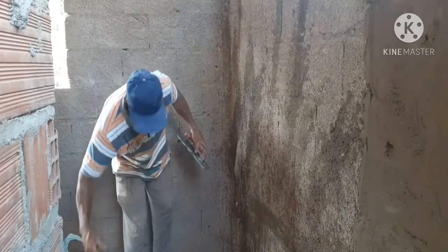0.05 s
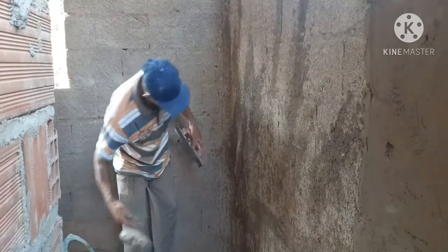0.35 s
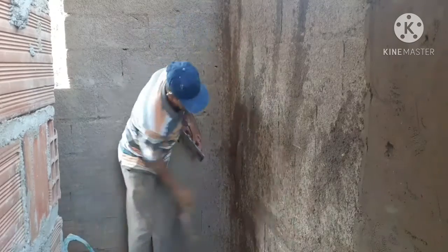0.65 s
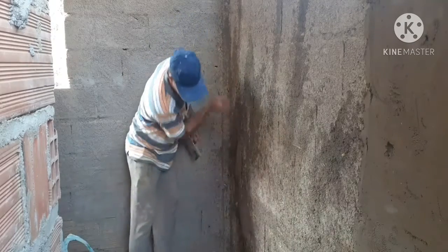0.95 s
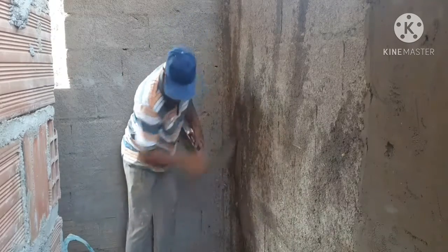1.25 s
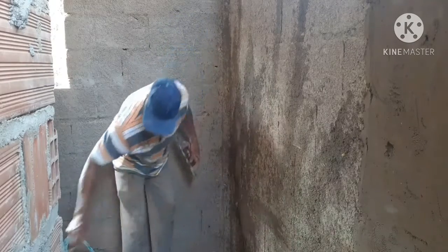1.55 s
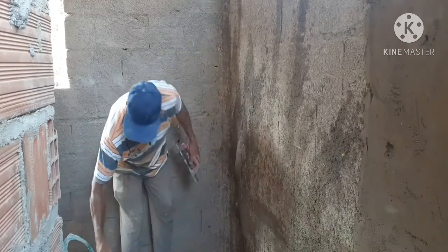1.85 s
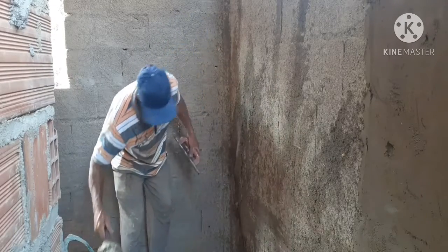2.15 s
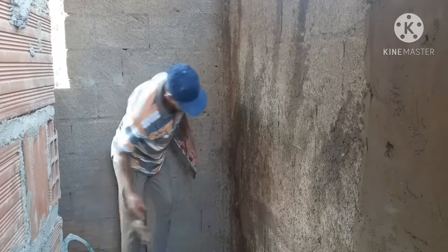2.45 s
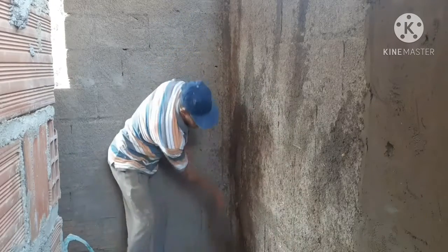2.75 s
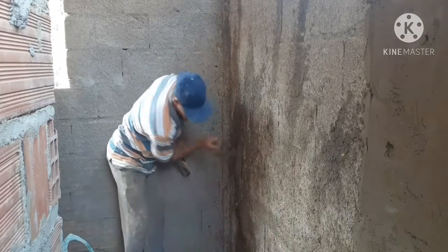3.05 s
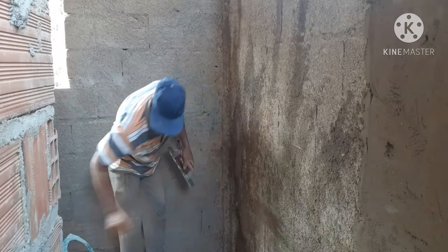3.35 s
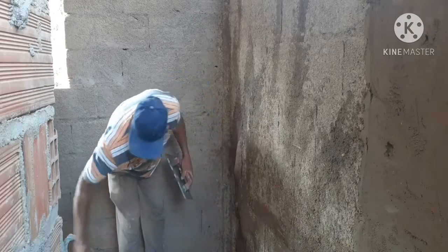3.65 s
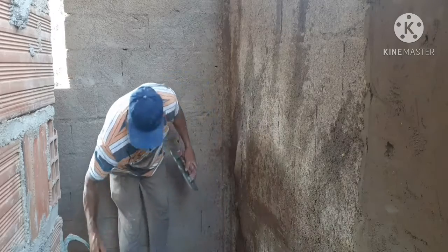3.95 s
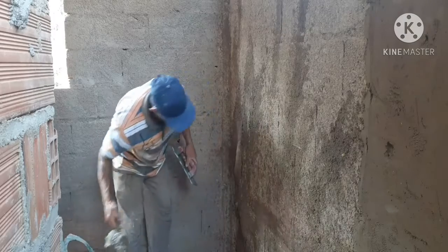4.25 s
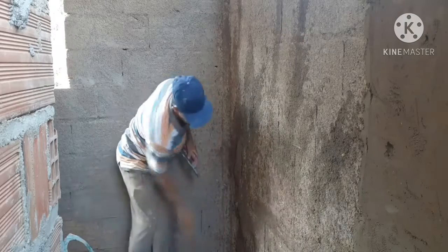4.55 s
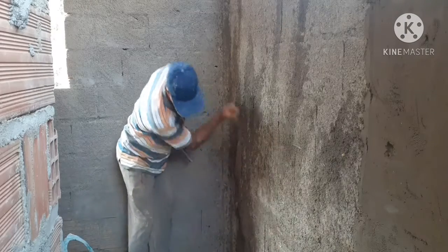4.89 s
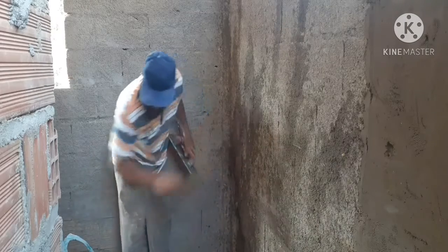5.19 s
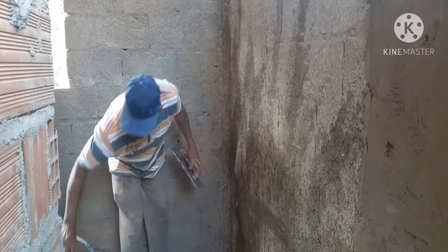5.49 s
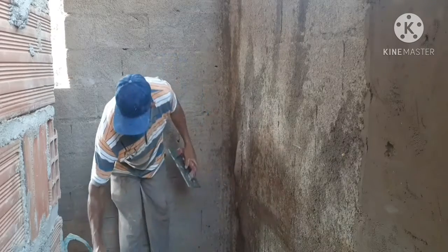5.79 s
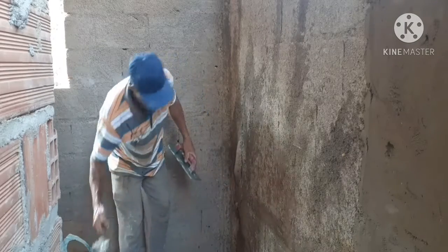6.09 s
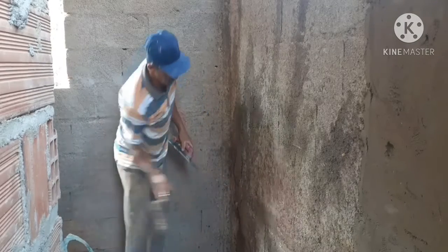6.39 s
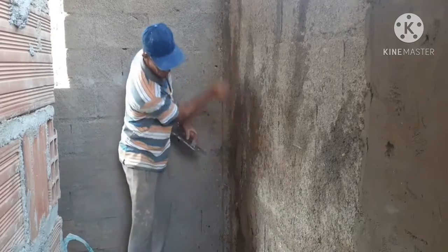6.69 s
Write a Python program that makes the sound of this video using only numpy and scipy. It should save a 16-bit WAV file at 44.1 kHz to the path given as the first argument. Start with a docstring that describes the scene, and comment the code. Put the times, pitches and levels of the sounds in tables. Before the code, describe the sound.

Four sharp, wet splats of thrown mortar in a small bare room, a trowel scooping between them, over distant traffic and birds.

```python
"""A small bare concrete room, where a plasterer throws four trowels of wet mortar at a block wall.
Each load hisses off the blade and lands as four clods in about 20 ms: a thud, a wet smack, a sandy spray.
Crumbs tick down, and the trowel knocks and scrapes in the tub; the walls add a quick, dense echo.
Outside, small birds chirp far off over a low rumble and distant traffic.
We listen from a phone with two microphones, a few metres away."""
import sys
import numpy as np
from scipy import signal
from scipy.fft import rfft, irfft
from scipy.io import wavfile
from scipy.ndimage import uniform_filter1d

SR = 44100
rng = np.random.default_rng(int(sys.argv[2]) if len(sys.argv) > 2 else 0)


def output_pcm(signal):
    """Save a mono or channel-first signal as 16-bit PCM at the path in sys.argv[1].

    Samples are clipped to [-1, 1] before scaling.
    """
    pcm = np.clip(np.atleast_2d(signal).T, -1, 1) * 32767
    wavfile.write(sys.argv[1], SR, np.round(pcm).astype(np.int16))


N = 305613
TIME, SECOND, TAIL = (np.arange(n) / SR for n in (N, SR, SR * 6 // 10))  # time axes in seconds


def undb(db):
    """Decibels to gain."""
    return 10 ** (np.asarray(db) / 20)


def unit(x):
    """Scale to an average energy of one per channel."""
    return x / np.sqrt(np.mean(np.sum(x ** 2, axis=-1)) + 1e-30)


def level(x, db):
    """Scale a steady sound to an rms level."""
    return unit(x) * np.sqrt(x.shape[-1]) * undb(db)


def burst(x, db):
    """Scale a short sound to the energy of 10 ms at this level."""
    return unit(x) * np.sqrt(SR / 100) * undb(db)


def lookup(points, hz):
    """Read (Hz, value) points on a log-frequency axis."""
    f, value = np.transpose(points)
    return np.interp(np.log(hz + 1e-9), np.log(f), value)


def colour(x, points):
    """Minimum-phase EQ through (Hz, dB) points, rolling off below the first."""
    size = 4096
    hz = np.arange(size // 2 + 1) * SR / size
    gain = undb(lookup(points, hz)) * np.clip(hz / points[0][0], .01, 1) ** 2
    cepstrum = irfft(np.log(gain))
    cepstrum[1:size // 2] *= 2
    cepstrum[size // 2 + 1:] = 0
    response = irfft(np.exp(rfft(cepstrum)))
    return np.apply_along_axis(lambda v: signal.fftconvolve(v, response)[:len(v)], -1, x)


def add(track, s, sound):
    """Mix a sound in at s seconds."""
    i = max(int(s * SR), 0)
    track[..., i:i + sound.shape[-1]] += sound[..., :max(N - i, 0)]


def drift(rate_hz):
    """Smooth random modulation with a spread near one."""
    hold = max(int(SR / rate_hz), 1)
    steps = np.repeat(rng.standard_normal(N // hold + 1), hold)
    return np.sqrt(2) * uniform_filter1d(steps, hold)[:N]


def swell(s, rise_s, fall_s):
    """Speed of one sweep of the arm: up to a peak of one and down again."""
    t = TIME - s
    return np.exp(-.5 * np.clip(t / np.where(t < 0, rise_s, fall_s), -10, 10) ** 2)


def grit(n, spread_db):
    """Dense sand-grain clicks; more spread makes a few stand out."""
    grains = rng.standard_normal(n)
    size_db = max(spread_db, 0) * np.minimum(rng.exponential(size=n), 6)
    return level(grains * undb(size_db), 0)


def splat(eq, db, fade_s, spread_db):
    """One soft contact: a rush of grain clicks that dies within milliseconds."""
    t = SECOND[:SR // 8]
    return burst(colour(grit(len(t), spread_db) * np.exp(-t / fade_s), eq), db)


def pop(hz, db, cycles):
    """A pressure pulse that peaks after this many cycles and dies."""
    phase = hz * SECOND[:SR // 8]
    return burst(np.sin(2 * np.pi * phase) * phase * np.exp(-np.minimum(phase / cycles, 20)), db)


def ring(modes):
    """A struck resonance: one decaying sine per mode."""
    return sum(undb(db) * unit(np.sin(2 * np.pi * hz * TAIL) * undb(-60 * np.minimum(TAIL / t60, 10)))
               for hz, db, t60 in modes)


def diffuse(n, mic_gap_m=.2):
    """Noise from all sides at two spaced microphones: alike in the bass, unrelated in the treble."""
    mid, side = rfft(rng.standard_normal((2, n)))
    likeness = .97 * np.sinc(2 * np.arange(len(mid)) * SR / n * mic_gap_m / 343)
    mid *= np.sqrt((1 + likeness) / 2)
    side *= np.sqrt((1 - likeness) / 2)
    return irfft(np.array([mid + side, mid - side]), n)


def flatten(response, width_hz=110):
    """Even out the random echo's broad bands, keeping its fine ripple, so every hit has a like tone."""
    spectrum = rfft(response, SR)
    power = uniform_filter1d(np.mean(abs(spectrum) ** 2, axis=0), width_hz)
    return unit(irfft(spectrum / np.sqrt(power + 1e-20))[:, :len(TAIL)])


# Standing waves between the walls. Each row: pitch in Hz, relative level in dB, t60 in seconds.
ROOM_MODES = [(49.6, -22, .6), (77, -24.5, 0.5), (106, -31.5, 0.28), (180.5, -26.5, 0.36),
              (236, -32.5, 0.13), (294, -39, 0.68), (419, -35.5, 0.58), (626, -20.5, 0.16),
              (802.5, -25, 0.2), (950, -22, 0.12), (1201, -24, 0.14), (1900, -24.5, 0.18)]
# How long the echo hangs. Each row: frequency in Hz, t60 in seconds.
ROOM_T60 = [(60, 0.58), (160, 0.26), (400, 0.19), (1000, 0.17), (3000, 0.18), (6000, 0.14), (14000, 0.16)]

def room(x, direct_db, late_db, left_db, lag_s):
    """Direct sound, a dense echo off near walls, standing waves and a faint tail from rooms beyond."""
    n = len(TAIL)
    spectrum, hz = rfft(diffuse(n)), np.arange(n // 2 + 1) * SR / n
    band_position = np.clip(np.log((hz + 1) / 60) / np.log(3), 0, 5)
    echo = 0
    for k in range(6):
        band = irfft(spectrum * np.maximum(1 - abs(band_position - k), 0), n)
        echo = echo + band * undb(-60 * TAIL / lookup(ROOM_T60, 60 * 3 ** k))
    attack = 1 - np.exp(-np.minimum(TAIL / .00046, 20))
    echo = unit(echo * attack)
    # the direct sound reaches the right microphone lag_s after the left
    echo[0, 0] += undb(direct_db)
    echo[1, int(lag_s * SR)] += undb(direct_db)
    beyond = colour(diffuse(n), [(40, 11), (500, -.5), (2500, -2.5), (12000, -3.5)])
    beyond *= undb(-60 * TAIL / .55)
    response = flatten(echo) + undb(-7.5) * ring(ROOM_MODES) + undb(late_db) * unit(beyond)
    pan = undb(np.array([[left_db], [-left_db]]) / 2)
    return signal.fftconvolve(x[None], unit(response), axes=-1)[:, :N] * pan


# EQs for the outdoor air, the traffic's whine and its drone. Each row: frequency in Hz, gain in dB.
AIR_EQ = [(18, -53.5), (30, 10.5), (152, -7.5), (410, -30), (443, -31.5), (492, -28.5), (691, -32.5),
          (808, -20), (1080, -52.5), (3400, -46), (3880, -55.5), (15500, -47.5)]
WHINE_EQ = [(300, -14.5), (560, 2), (700, 0), (810, 4), (1020, -3.5), (1230, -1.5), (1370, 1), (1520, -4),
            (1850, -11), (2250, -24.5), (2440, -15), (3000, -18), (6000, -39.5), (15000, -24.5)]
DRONE_EQ = [(150, -3.5), (210, -26), (240, 2.5), (275, -8), (370, -7), (520, -22.5), (1500, -44)]
# Traffic comes and goes. Each row: time in seconds, whine fader in dB, drone fader in dB.
TRAFFIC_FADERS = [(0, -71, -59), (.7, -76.5, -69.5), (2.602, -61, -69), (4.5, -67, -70), (5.3, -61, -60.5),
                  (6.198, -66.5, -61), (6.9, -56.5, -56.5)]
# The bed leans left. Each row: frequency in Hz, left minus right in dB.
OUTDOOR_PAN = [(60, 3.5), (110, 3.5), (220, 8), (700, 5.5), (1300, 6), (2400, 1.5), (15000, 1.5)]

def outdoors():
    """A restless bed of low rumble and far traffic, coming in through an opening on the left."""
    air = level(colour(diffuse(N), AIR_EQ), -56)
    bass = signal.sosfiltfilt(signal.butter(2, 350, fs=SR, output="sos"), air)
    s, *faders = np.transpose(TRAFFIC_FADERS)
    whine_db, drone_db = (np.interp(TIME, s, fader) for fader in faders)
    whine = level(colour(diffuse(N), WHINE_EQ), -3.2) * undb(whine_db + .87 * drift(9))
    drone = level(colour(diffuse(N), DRONE_EQ), -2.2) * undb(drone_db + 2.2 * drift(3.7))
    rumble = bass * undb(1.3 * drift(11))
    hiss = (air - bass) * undb(3.5)
    left_db = lookup(OUTDOOR_PAN, np.arange(N // 2 + 1) * SR / N)
    pan = undb(np.array([left_db, -left_db]) / 2)
    return irfft(rfft(rumble + hiss + whine + drone) * pan, N)


# Tones in the traffic. Each row: pitch in Hz, level in dB relative to the whine fader.
WHINE_TONES = [(700, -10.5), (810, -18), (1370, -18.5), (2440, -24)]

def traffic_tones():
    """A few rough, wavering tones stand out of the far traffic, fading in and out."""
    s, whine_db, _ = np.transpose(TRAFFIC_FADERS)
    warped_time = np.cumsum(1 + .03 * drift(4) + .04 * drift(130)) / SR
    tones = sum(undb(db + 3.7 * drift(4.7)) * np.sin(2 * np.pi * hz * warped_time)
                for hz, db in WHINE_TONES)
    fader = undb(np.interp(TIME, s, whine_db))
    return room(tones * fader, direct_db=-14, late_db=-8.5, left_db=9, lag_s=0)


# EQs for bright sand on steel and the tub's hollow scrape. Each row: frequency in Hz, gain in dB.
SAND_EQ = [(2500, -27.5), (5000, -9.5), (7000, -9.5), (10500, -2.5), (15500, -8.5)]
SCRAPE_EQ = [(150, -12.5), (330, 10), (600, 3), (850, 7.5), (1100, 4), (1330, 8.5), (1600, 0), (2400, 3),
             (3200, -0.5), (4500, 2), (6500, -6), (12000, -22.5)]
# Blade strokes, mostly a dig and then a softer lift.
# Each row: fastest moment in seconds, rise in seconds, sand level in dB, scrape level in dB.
STROKES = [(.07, 0.13, -61, -77), (1.178, 0.053, -66.5, -61.5), (1.561, 0.024, -60.5, -64),
           (1.64, 0.018, -70, -67), (1.797, 0.01, -47, -52), (2.085, 0.061, -60, -71.5),
           (3.757, 0.027, -51, -51), (3.96, 0.21, -75, -64), (4.089, 0.076, -62, -67.5),
           (5.739, 0.052, -52.5, -54), (5.96, 0.099, -62.5, -68)]

def scoops():
    """The blade drags unevenly through mortar: sand hisses on the steel and the tub resonates."""
    sand = level(colour(grit(N, spread_db=5), SAND_EQ), 0)
    scrape = level(colour(grit(N, spread_db=4), SCRAPE_EQ), 0)
    strokes = sum(swell(s, rise_s, fall_s=.046) * (sand * undb(sand_db) + scrape * undb(scrape_db))
                  for s, rise_s, sand_db, scrape_db in STROKES)
    return strokes * undb(1.75 * drift(70))


# Far calls. Each row: start in seconds, length in seconds, centre pitch in Hz, relative level in dB.
BIRD_CALLS = [(0.237, .13, 3920, -70.5), (2.42, 0.11, 4290, -77.5), (2.583, 0.13, 3790, -66),
              (3.427, 0.14, 4370, -71), (3.927, 0.061, 4060, -65), (4.364, 0.047, 6060, -81),
              (4.494, .14, 4145, -71), (5.139, .07, 4440, -68.5), (5.3, 0.12, 3840, -63.5),
              (6.165, 0.098, 3995, -68), (6.205, 0.1, 5430, -77)]

def birds(note_s=.035, step_s=.02, echo_t60=.5):
    """Falling runs of short raspy notes with a scratchy edge, smeared by the yards they cross."""
    out, n = np.zeros(N), int(note_s * SR)
    fall, scatter = .28, .075  # shares of the pitch: slide over a call, spread between notes
    for s, length, hz, db in BIRD_CALLS:
        rasp = level(uniform_filter1d(rng.standard_normal(SR), size=40), 0)
        scratch = level(signal.lfilter(np.hanning(22), 1, rng.standard_normal(SR)), -4)
        for delay, detune in zip(np.arange(0, length - note_s / 2, step_s), rng.standard_normal(20)):
            part = slice(int(delay * SR), int(delay * SR) + n)
            pitch = hz * (1 + fall * (.5 - SECOND[part] / length) + scatter * detune)
            phase = 2 * np.pi * np.cumsum(pitch * (1 + .06 * rasp[part])) / SR
            note = np.sin(phase) * (undb(14) + scratch[part]) * np.hanning(n)
            add(out, s + delay, level(note, db - 3))
    yards = unit(diffuse(SR) * undb(-60 * SECOND / echo_t60))
    return signal.fftconvolve(out[None], yards, axes=-1)[:, :N]


# EQs for crisp flying sand and a crumb's duller body. Each row: frequency in Hz, gain in dB.
SPRAY_EQ = [(1000, -28), (3500, -6), (6200, -6.5), (8000, 1), (11000, 4.5), (14000, -1), (16000, -3.5)]
CRUMB_BODY_EQ = [(500, -13), (1300, 0), (2600, -11), (3600, -2.5), (7000, -15)]
# The larger crumbs. Each row: start in seconds, relative level in dB.
CRUMBS = [(0.244, -56.5), (2.397, -56.5), (3.0545, -44.5), (3.092, -51), (4.971, -42), (5.0166, -54),
          (5.1516, -57), (5.2997, -50.5)]

def crumbs(per_throw=12, patter_s=.24):
    """Single crumbs tick on the floor and the blade; after each throw more patter down at random."""
    out = np.zeros(N)
    for s, db in CRUMBS:
        add(out, s, splat(SPRAY_EQ, db - 6.5, fade_s=.00055, spread_db=13))
        add(out, s, splat(CRUMB_BODY_EQ, db - 13.5, fade_s=.0039, spread_db=2))
    for s, *_ in THROWS:
        for lateness, size in rng.random((per_throw, 2)):
            tick = splat(SPRAY_EQ, -74 + 12 * size - 6 * lateness, fade_s=.00081, spread_db=15)
            add(out, s + .051 + patter_s * lateness, tick)
    return out


# EQ for the airy swish off the blade. Each row: frequency in Hz, gain in dB.
SWISH_EQ = [(880, -37), (1500, -6), (2030, -8.5), (2520, -9), (2970, -10.5), (3180, -7.5), (6620, -7),
            (11800, -2), (15500, -7)]
# Loads thrown at the wall. Each row: landing in seconds, gap between clods in seconds, smack level in dB,
# then pitch in Hz and level in dB for the thud, the small air pocket and the large one in turn,
# and last the swish's fade in seconds.
THROWS = [(0.8996, .0058, -25.5, 97, -29.5, 1230, -30.5, 440, -31.5, 0.067),
          (2.8806, 0.0066, -22.5, 110, -31, 3450, -31.5, 908, -27.5, 0.017),
          (4.8016, .0052, -22, 71.1, -25.5, 2830, -25, 670, -43, 0.0045),
          (6.6921, 0.007, -22, 94, -26.5, 2250, -31.5, 330, -26, .028)]

def swishes(lead_s=.018, rise_s=.028):
    """Sandy mortar slides off the swinging blade with a hiss that peaks just before it lands."""
    speed = sum(swell(s - lead_s, rise_s, fade_s) for s, *_, fade_s in THROWS)
    return speed * level(colour(grit(N, spread_db=4), SWISH_EQ), -44.5)


# EQ for the wet smack. Each row: frequency in Hz, gain in dB.
SMACK_EQ = [(100, -19), (200, 2), (400, -6), (650, 3), (1000, -4), (1350, -5.5), (2000, -4), (3200, -10.5),
            (4700, -10.5), (6000, -18.5), (16000, -21)]
# Every load lands as leading edge, bulk, then tail. Each row: smack and spray in dB relative to the
# throw's smack, thud in dB relative to its thud, thud pitch as a ratio.
CLODS = [(-8, -13.5, -6.5, 1.3), (-1.5, -11, -0.5, 1.91), (-2.5, -13.5, 2, 0.93), (-4, -15, -7.5, 0.54)]

def wall_slaps():
    """Each clod pushes a pulse of air, smacks flat and sprays sand; the middle two pop trapped air."""
    out = np.zeros((2, N))
    for s, gap_s, smack_db, thud_hz, thud_db, small_hz, small_db, large_hz, large_db, _ in THROWS:
        pockets = [0, pop(small_hz, small_db, cycles=1.05), pop(large_hz, large_db, cycles=.95), 0]
        for k, (smack_trim, spray_trim, thud_trim, ratio) in enumerate(CLODS):
            air = pop(thud_hz * ratio, thud_db + thud_trim, cycles=.19) + pockets[k]
            wet = splat(SMACK_EQ, smack_db + smack_trim, fade_s=.0048, spread_db=3.5)
            spray = splat(SPRAY_EQ, smack_db + spray_trim, fade_s=.0027, spread_db=.5)
            # every clod lands on another spot and so has its own echo
            clod = room(air + wet + spray, direct_db=0, late_db=-21, left_db=2, lag_s=0)
            add(out, s + k * gap_s, clod)
    return out


# The tub's dull boom. Each row: pitch in Hz, relative level in dB, t60 in seconds.
TUB_MODES = [(275, -38, 0.055), (392, 8, 0.025), (536, -2, 0.042)]
# EQ for the clack's hard edge. Each row: frequency in Hz, gain in dB.
CLACK_EQ = [(300, -21), (800, -1.5), (1400, 0), (2200, -6), (3500, -10.5), (8000, -22.5)]
# Trowel knocks and lumps dropping in the tub.
# Each row: start in seconds, relative clack level in dB, clack pitch in Hz, boom level in dB.
KNOCKS = [(1.106, -73, 700, -50.5), (1.191, -40.5, 820, -51), (1.208, -50, 1320, -77),
          (1.284, -56.5, 2220, -77), (1.415, -56, 810, -50), (1.4531, -50.5, 905, -44.5),
          (1.4735, -51, 1200, -71), (1.559, -51.5, 900, -51.5), (1.954, -54, 660, -60),
          (2.394, -55.5, 1840, -63.5), (3.0563, -75, 1300, -70), (3.289, -66, 910, -60),
          (3.5542, -42, 610, -47.5), (3.652, -40, 1220, -45.5), (5.2779, -54.5, 1380, -54),
          (6.527, -72, 896, -53.5)]

def tub_knocks():
    """A short clack of the blade, a boom of the tub damped by wet mortar, and grit shaken loose."""
    out = np.zeros(N)
    for s, clack_db, clack_hz, boom_db in KNOCKS:
        add(out, s, burst(ring(TUB_MODES), boom_db))
        add(out, s, pop(clack_hz, clack_db - 7.5, cycles=.31))
        add(out, s, splat(CLACK_EQ, clack_db - 8, fade_s=.0052, spread_db=0))
        add(out, s, splat(SAND_EQ, clack_db - 8, fade_s=.00069, spread_db=3))
    return out


def scene():
    """Work at the wall and at the tub, heard through the room, over the sounds from outside."""
    knocks = room(tub_knocks(), direct_db=1.5, late_db=-10.5, left_db=4.5, lag_s=.00005)
    ticks = room(crumbs(), direct_db=2, late_db=-22, left_db=3, lag_s=.00005)
    sand = room(swishes() + scoops(), direct_db=-5.5, late_db=-9.5, left_db=1.8, lag_s=.00024)
    return wall_slaps() + knocks + ticks + sand + birds() + outdoors() + traffic_tones()


def record(dry):
    """The phone cuts the deepest bass and the very top."""
    low_cut = signal.butter(10, 41, "highpass", fs=SR, output="sos")
    high_cut = signal.ellip(10, .2, 80, 15600, fs=SR, output="sos")
    return signal.sosfilt(high_cut, signal.sosfilt(low_cut, dry))


dry = scene()
out = record(dry)
output_pcm(out)
```